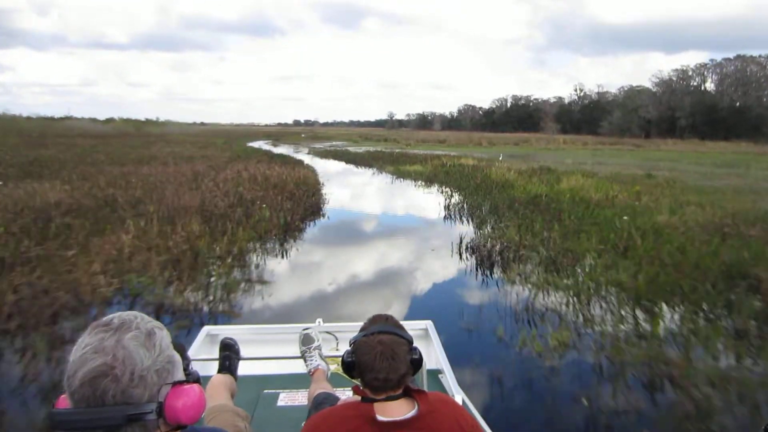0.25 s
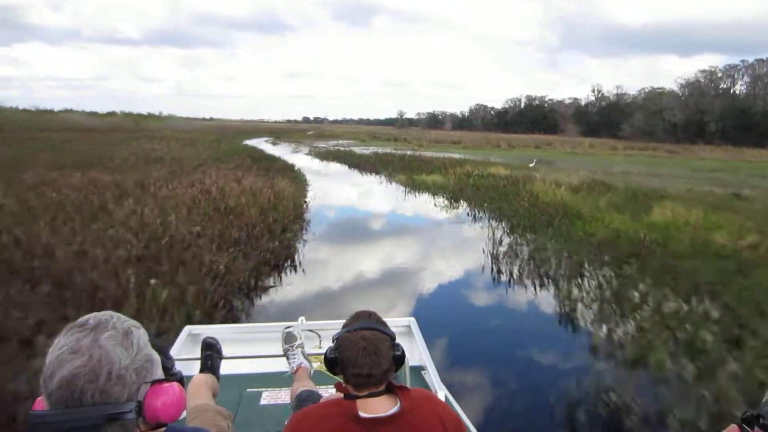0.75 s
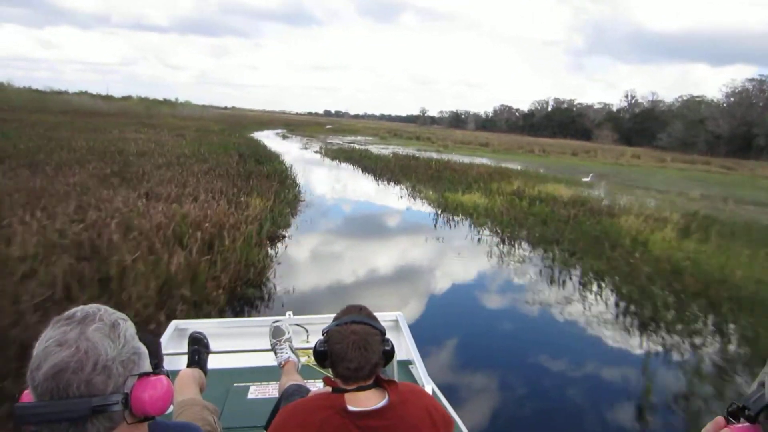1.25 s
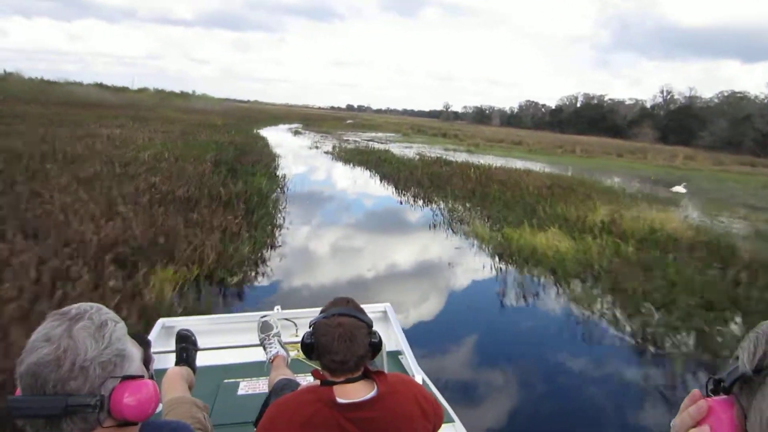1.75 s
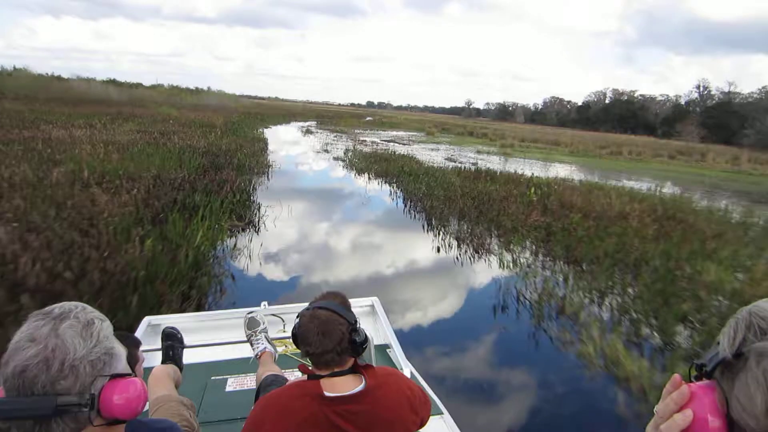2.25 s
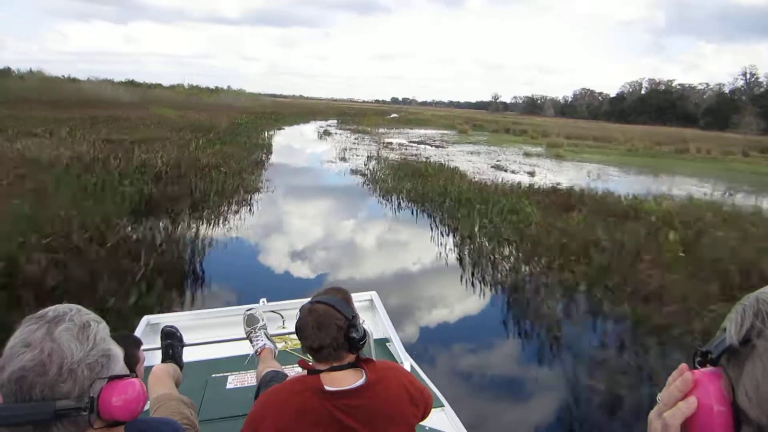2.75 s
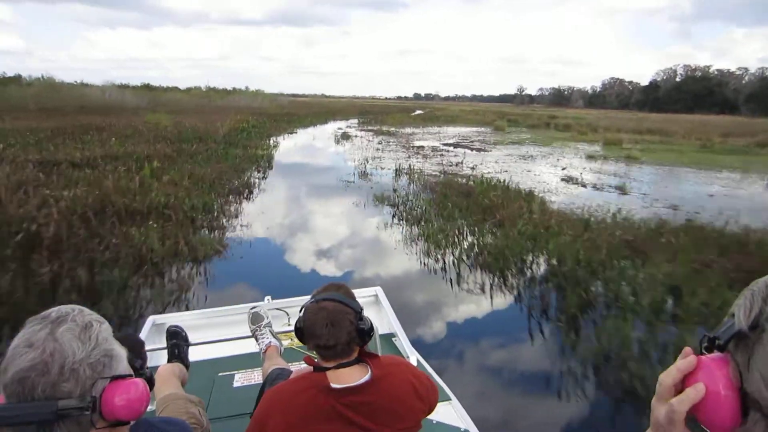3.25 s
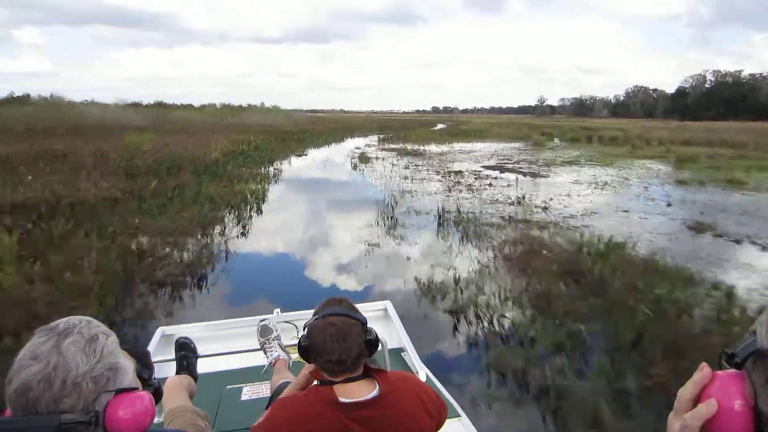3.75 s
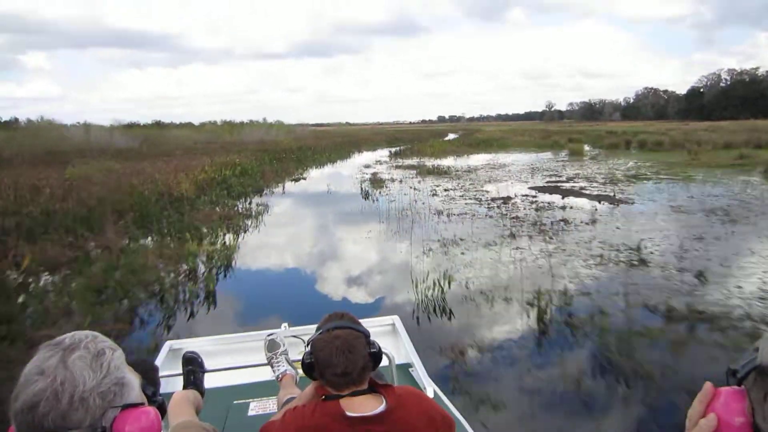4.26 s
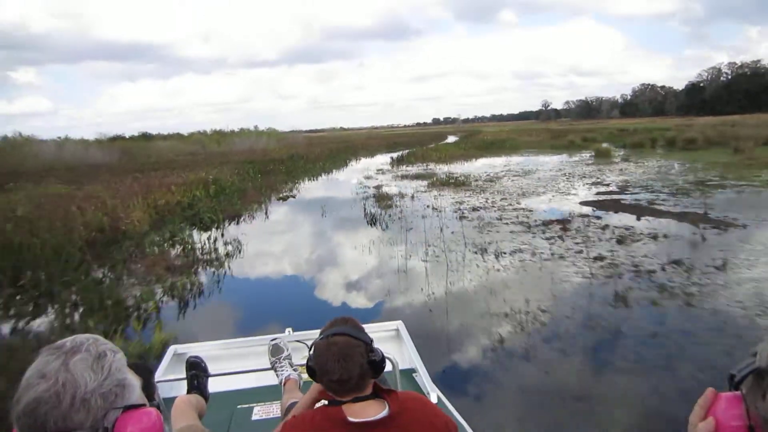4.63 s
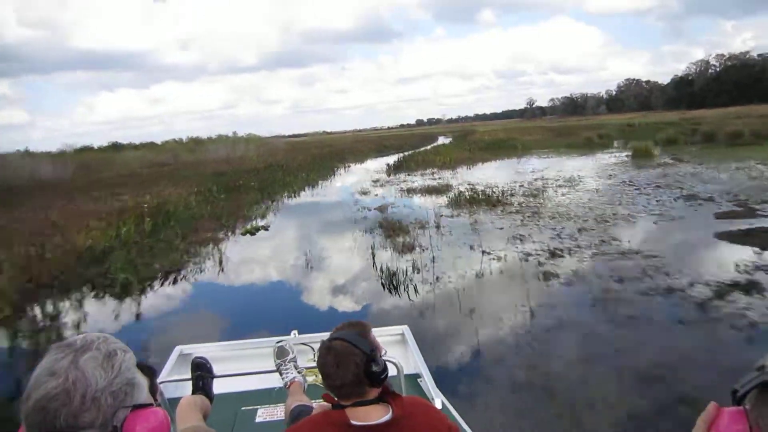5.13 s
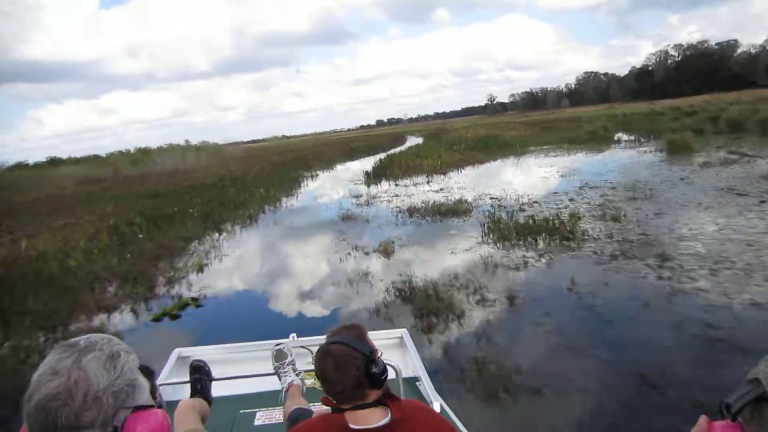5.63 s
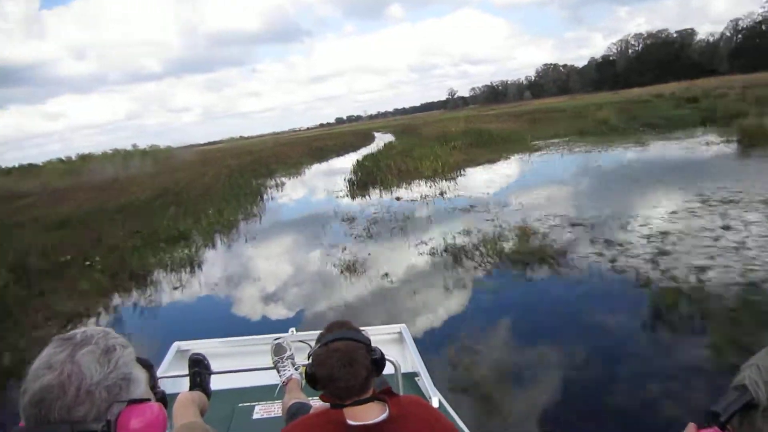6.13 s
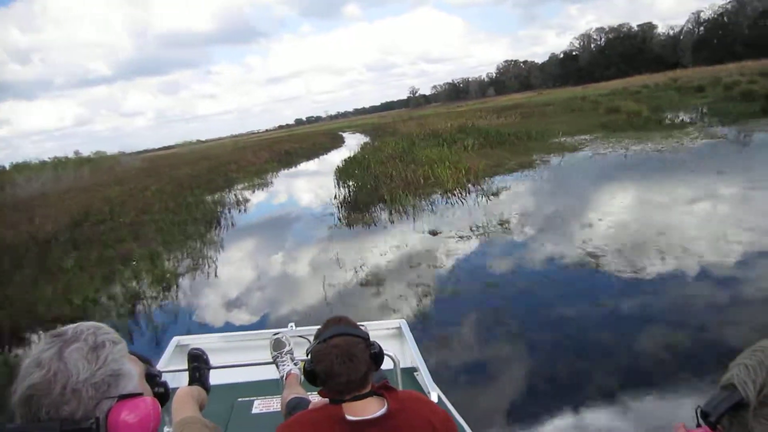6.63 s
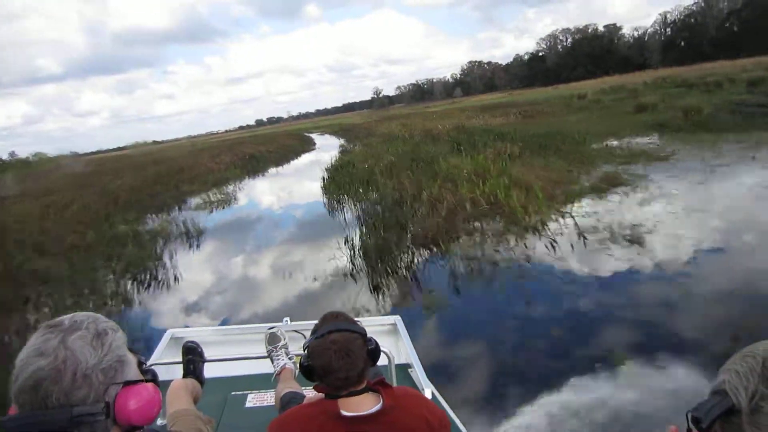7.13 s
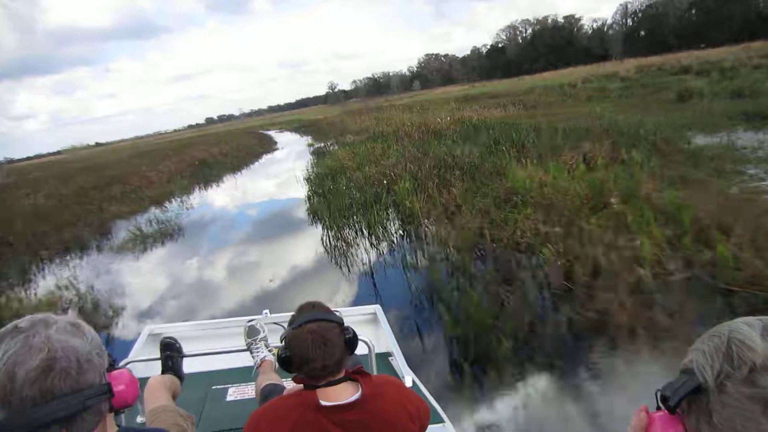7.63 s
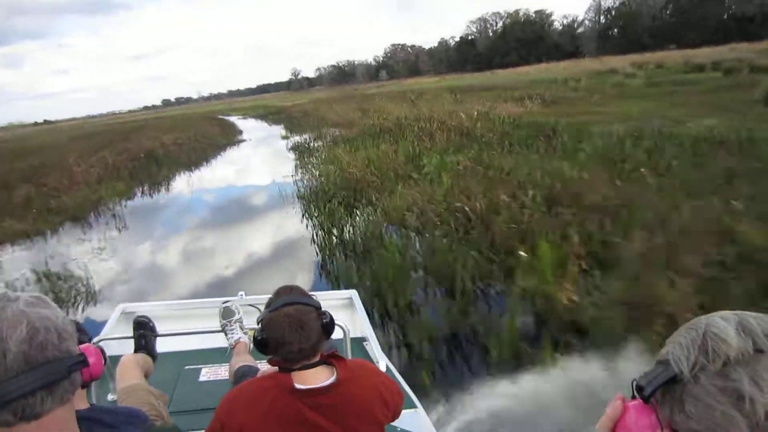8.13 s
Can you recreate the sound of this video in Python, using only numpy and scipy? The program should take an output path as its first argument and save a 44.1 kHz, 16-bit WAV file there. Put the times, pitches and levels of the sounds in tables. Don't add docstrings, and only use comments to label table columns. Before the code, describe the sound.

Heard from on board an airboat in an open marsh, with no room echo. Rough, fluttering wind dominates the first three seconds, covering a low propeller hum. The wind then eases with sharp snaps around five seconds, while the drone rises in steps to a full, buzzing roar from about six and a half seconds to the end.

```python
import sys
import numpy as np
from scipy import signal
from scipy.fft import rfft, irfft, next_fast_len
from scipy.io import wavfile
from scipy.ndimage import uniform_filter1d

SR = 44100
rng = np.random.default_rng(int(sys.argv[2]) if len(sys.argv) > 2 else 0)


def inscribe(sig):
    pcm = np.round(np.clip(np.atleast_2d(sig).T, -1, 1) * 32767)
    wavfile.write(sys.argv[1], SR, pcm.astype(np.int16))


def volts_from_decibels(level):
    exponent = np.asarray(level, float) / 20
    return 10 ** exponent


N = 369116
SIZE = next_fast_len(N)
TIME, FREQ = np.arange(N) / SR, np.fft.rfftfreq(SIZE, 1 / SR)
LEFT_RIGHT = np.array([[1], [-1]])


def columns(table):
    s, *cols = np.transpose(table)
    return [np.interp(TIME, s, col) for col in cols]


def on_log(table, hz):
    f, db = np.transpose(table)
    return np.interp(np.log(np.maximum(hz, 1)), np.log(f), db)


def colour(x, table):
    return irfft(rfft(x, SIZE) * volts_from_decibels(on_log(table, FREQ)), SIZE)[..., :N]


def walk(rate_hz):
    return np.interp(TIME * rate_hz, np.arange(4000), rng.standard_normal(4000))


def swell(centre_s, half_s):
    return np.exp(-((TIME - centre_s) / half_s) ** 2)


def tones(table, turns, load, lead, wobble_db, wobble_hz, skew):
    out = np.zeros((2, N))
    for k, *db in table:
        order = round(k)
        level_db = np.interp(load, [0, .5, 1], db) + wobble_db * walk(wobble_hz)
        angle = 2 * np.pi * order * turns + lead(order) + .1 * walk(wobble_hz)
        lean_db = LEFT_RIGHT * (1.5 / k - .5)
        wave = np.cos(angle) + skew * np.sin(angle) * LEFT_RIGHT
        out += np.sqrt(2) * volts_from_decibels(level_db) * volts_from_decibels(lean_db) * wave
    return out


# (time [s], blade rate [Hz])
BLADE_RATE = [(0.0, 67.26), (0.5, 67.2), (1.3, 67.63), (2.1, 68.19), (2.8, 68.36), (3.4, 68.31),
              (4.1, 68.05), (4.8, 67.8), (5.3, 67.16), (6.0, 66.53), (6.7, 66.38), (7.3, 66.2),
              (7.9, 66.41), (8.37, 66.65)]


def propeller_turns():
    hz, = columns(BLADE_RATE)
    return np.cumsum(hz) / SR


# (time [s], load [0-1])
BLADE_LOAD = [
    (0, 0.01),
    (2, 0.06),
    (3, 0.12),
    (3.6, 0.32),
    (4.2, 0.61),
    (5.3, 0.56),
    (6.3, 0.9),
    (6.8, 1),
    (8.2, 1),
    (8.37, 0.87),
]


def propeller_load():
    return columns(BLADE_LOAD)[0]


def blade_lead(k):
    low = min(k, 7)
    hull_boom = 1.5 * max(low - 3, 0)
    return np.pi + .8 * k + low ** 2 + hull_boom + .45 * (k - low)


# (multiple of blade rate, light load [dB], half load [dB], full load [dB])
BLADE_TONES = [(1, -41.5, -37, -34.5), (2, -38.5, -32, -27), (3, -31, -31, -25.5), (4, -40.5, -33, -25),
               (5, -38.5, -36.5, -28.5), (6, -42, -39.5, -27.5), (7, -43.5, -37, -34),
               (8, -50, -43.5, -32.5), (9, -50, -41, -32.5), (10, -40, -35, -36), (11, -49, -46, -42),
               (14, -53, -56, -42.5)]


def blade_beat(turns, load):
    return tones(BLADE_TONES, turns, load, blade_lead, wobble_db=0.57, wobble_hz=7., skew=0.16)


def pipe_lead(k):
    return -.6


# (multiple of camshaft rate, light load [dB], half load [dB], full load [dB])
ENGINE_TONES = [(2.01, -60, -58, -54), (2.997, -50, -46, -40.5), (4, -54, -49, -47), (5, -42.5, -34.5, -29),
                (6, -56, -56, -49), (7, -52, -48, -42.5), (8, -44, -41, -38), (9, -62, -49, -41.5),
                (11, -58, -45, -40), (12, -46.5, -46, -49), (13, -58, -51, -45), (15, -57, -50, -46),
                (35, -66, -56, -50), (96, -64, -61, -48)]


def engine(turns, load):
    cam_turns = .38193 * turns + .111
    return tones(ENGINE_TONES, cam_turns, load, pipe_lead, wobble_db=0.5, wobble_hz=6., skew=.25)


# (frequency [Hz], level [dB])
ROAR_SPECTRUM = [(18, -41), (30, -30), (124, -13.5), (280, -2.5), (800, -11.5), (2400, -26), (3100, -33),
                 (4500, -54), (16000, -76)]


def tip_roar(turns, load):
    swish = 1 + 0.33 * np.cos(2 * np.pi * turns - 1.2) + .15 * np.cos(4 * np.pi * turns + 1.4)
    common, apart = colour(rng.standard_normal((2, N)) * swish, ROAR_SPECTRUM)
    roar = (common + 0.19 * apart * LEFT_RIGHT) / np.std(common)
    return roar * volts_from_decibels(-37 + 13 * load + 0.91 * walk(12.))


# (frequency [Hz], level [dB])
SPRAY_SPECTRUM = [(1500, -20), (3500, 0), (6000, 0), (8500, -5), (11000, -12.5), (16000, -17)]


def hull_spray(load):
    grains = rng.standard_normal((3, N)) * volts_from_decibels(1.5 * walk(200.))
    ahead, *sides = colour(grains, SPRAY_SPECTRUM)
    spray = (0.48 * ahead + np.array(sides)) / np.std(ahead)
    return spray * volts_from_decibels(-53 + 7.36 * load + 0.42 * walk(13.0))


def cage_rattle(load):
    ring_hz, width_hz = 2930, 78
    response = 1 / (1 + (2 * (FREQ - ring_hz) / width_hz) ** 4)
    ring = irfft(rfft(rng.standard_normal(SIZE)) * response, SIZE)[:N]
    return ring / np.std(ring) * volts_from_decibels(-63 + 10.0 * load)


# (frequency [Hz], level [dB])
WIND_SPECTRUM = [(18, -43), (30, -18), (93, -2), (194, 2), (512, 1.5), (801, -0.5), (1960, -11),
                 (3000, -21.5), (3900, -30.5), (6700, -39), (9200, -49), (12000, -58.5), (16000, -57)]
# (frequency [Hz], level [dB])
RIGHT_PORT = [(60, -5.5), (700, -2), (1300, 0.5), (4400, 1.5), (15000, 0.5)]


def port_eddies():
    eddies = rfft(rng.standard_normal((2, SIZE))) * volts_from_decibels(on_log(WIND_SPECTRUM, FREQ))
    eddies[1] *= volts_from_decibels(on_log(RIGHT_PORT, FREQ))
    inside = (FREQ > 300) & (FREQ < 1500)
    return eddies / (np.sqrt(np.sum(abs(eddies[:, inside]) ** 2) / 2) / SIZE)


# (time [s], half length [s], hiss level [dB])
PUFFS = [(.4, 1, 6.5), (1.2, 0.24, 2), (1.8, .15, 1.5), (2.25, 0.1, -3.5), (2.38, .05, 4),
         (2.75, 0.13, 4.5), (3.15, .2, 7.5), (3.4, .06, 1.5), (3.7, 0.17, 2), (4.12, .1, 5.5),
         (4.4, .1, -1.5), (4.65, 0.11, -7), (4.88, .06, 6), (5.12, .06, 2), (5.5, 0.059, -3.5),
         (6.15, .1, -1), (6.5, .3, -2.5), (7.0, .06, 2), (7.13, .06, -2), (7.5, .08, -1), (7.85, 0.26, 4),
         (8.3, .12, -2)]


def puffs_db():
    return sum(db * swell(s, half_s) for s, half_s, db in PUFFS)


# (time [s], extra level [dB])
SNAPS = [(.669, 0), (1.238, 9), (1.955, 7), (2.052, 9), (4.184, 3), (4.518, 6), (4.683, 22), (4.712, 11),
         (4.777, 4), (4.891, 11), (5.012, 1), (5.04, 9), (5.065, 4), (5.169, 15), (5.206, 7), (5.32, 6),
         (5.65, 4), (5.85, 7), (7.181, 5)]


def snaps_db():
    return sum(db * swell(s, 0.0016) for s, db in SNAPS) * np.array([[.3], [1]])


# (time [s], depth [dB])
LULLS = [(.76, 4), (1.01, 1), (1.17, 13), (1.22, 8), (1.32, 6), (1.5, 2), (1.79, 5), (2.11, 2), (2.35, 3),
         (2.82, 3), (2.96, 7), (3.0, 13), (3.33, 10), (3.76, 7)]


def lulls_db():
    return sum(db * swell(s, 0.0098) for s, db in LULLS)


# (frequency [Hz], level [dB])
COMMON_WIND = [(60, -11.5), (200, -7), (700, -8.5), (1300, -7.5), (2400, -6.5), (4400, -3), (8100, -1.5),
               (15000, -0.5)]


def widen(ports):
    common = colour((ports[0] + ports[1]) / 2, COMMON_WIND)
    apart = (ports[0] - ports[1]) / 2
    return np.array([common + apart, common - apart])


# (time [s], strength [dB], left minus right lean [dB])
GUSTS = [(0, -17, -2.5), (.65, -16, -1.5), (1.35, -17, -2), (1.9, -16, -1.2), (2.5, -15.5, -1.8),
         (2.88, -15, -2.5), (3.05, -17.5, -3), (3.6, -18, -3), (4.1, -21, -4.5), (4.4, -18.5, -5),
         (4.62, -21, -5), (5.0, -19.5, -5), (5.4, -22, -3.2), (5.9, -21.5, 0), (6.3, -21, 0),
         (7.4, -21.5, 0.7), (7.8, -21.5, 1), (8.1, -21.8, .8)]


def head_wind():
    gust_db, side_db = columns(GUSTS)
    lean_db = np.array([side_db, -side_db])
    hiss_db = -19 + 1.1 * side_db + puffs_db()
    eddies, snap_db, lull_db = port_eddies(), snaps_db(), lulls_db()
    flutter = walk(40.)
    flutter = 0.72 * flutter - 0.43 * flutter ** 2
    tear = np.array([walk(380.), walk(380.)])
    tear = (tear + 0.2 * tear ** 2) * (1 + 0.14 * np.maximum(lean_db, 0))
    ease_db = np.minimum(gust_db + 15.5, 0)
    octave = np.log2(np.maximum(FREQ, 1))
    out = 0
    for centre in np.arange(5, 15):
        share = np.cos(np.pi / 2 * np.clip(octave - centre, -1, 1)) ** 2
        high = np.clip((centre - 9.6) / 3.7, 0, 1)
        low = np.clip((8.6 - centre) / 0.53, 0, 1)
        db = gust_db + high * (hiss_db + 18.0 - lull_db + 0.49 * ease_db) - 0.24 * low * ease_db
        db = db + (0.35 + 1.5 * high) * flutter + 0.71 * walk(22.)
        db = db + (1.1 + 1.5 * high) * tear
        db = db + (0.51 + 0.66 * high) * (1 - low) * snap_db
        out = out + volts_from_decibels(db - 0.67) * irfft(eddies * share, SIZE)[:, :N]
    return widen(out * volts_from_decibels(0.69 * lean_db))


def scene():
    turns, load = propeller_turns(), propeller_load()
    drive = blade_beat(turns, load) + engine(turns, load) + tip_roar(turns, load) + hull_spray(load)
    return drive + cage_rattle(load) + head_wind()


# (frequency [Hz], level [dB])
PORT_NOTCH = [(8500, 0), (10500, -3), (11500, -11.5), (12000, -19), (12500, -12), (13300, -5.5),
              (15000, -3)]
# (frequency [Hz], level [dB])
TOP_LIMIT = [(15760, 0), (15860, -60)]


def port_response(x):
    return colour(colour(x, PORT_NOTCH), TOP_LIMIT)


def band_limit(x):
    return signal.sosfilt(signal.butter(12, 16950, fs=SR, output="sos"), x)


def record(dry):
    square = dry ** 2
    bent = dry + 0.31 * (square - uniform_filter1d(square, size=800))
    common = np.mean(bent, axis=0)
    bent = bent - common + np.tanh(1.807 * common) / 1.79
    rounded = np.tanh(1.327 * bent) / 1.281
    return band_limit(port_response(rounded))


dry = scene()
out = record(dry)
inscribe(out)
```